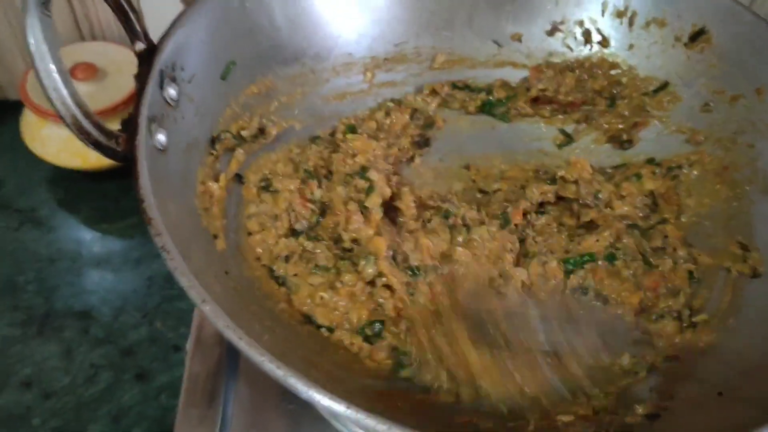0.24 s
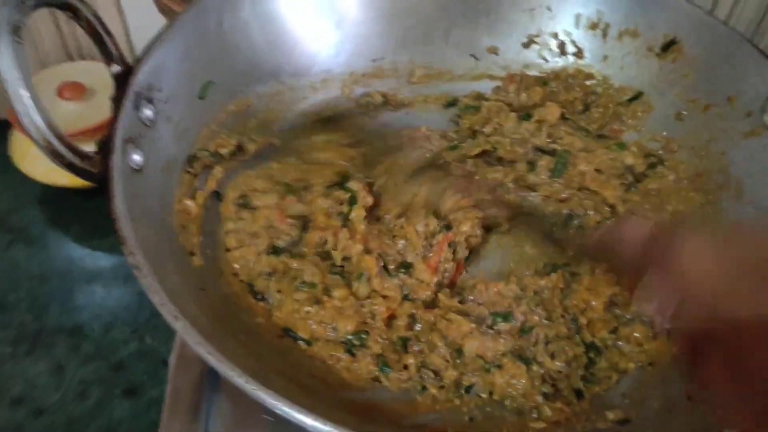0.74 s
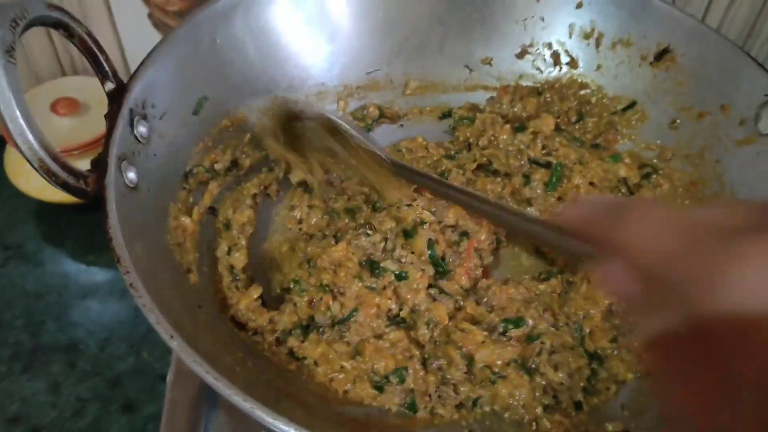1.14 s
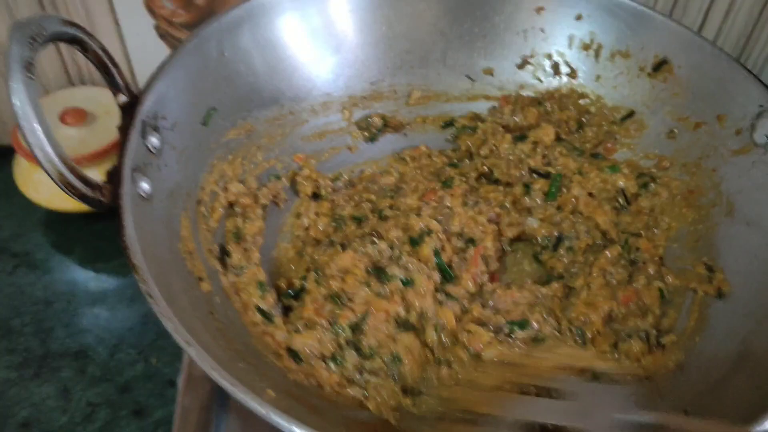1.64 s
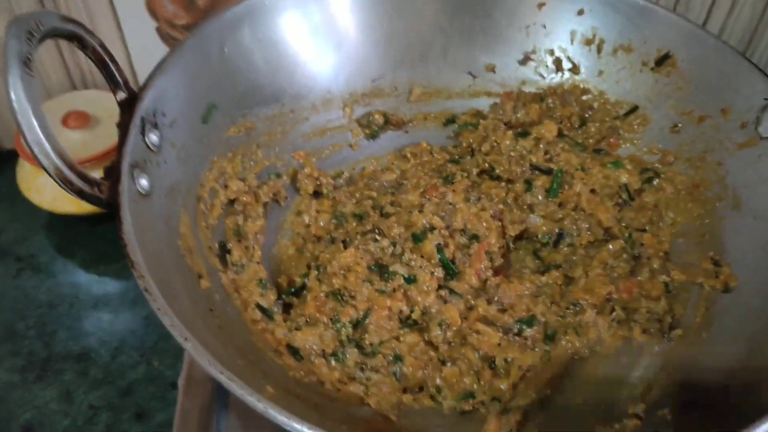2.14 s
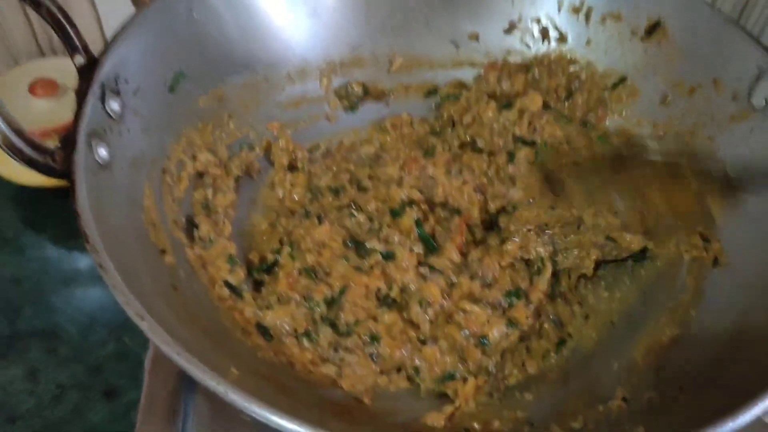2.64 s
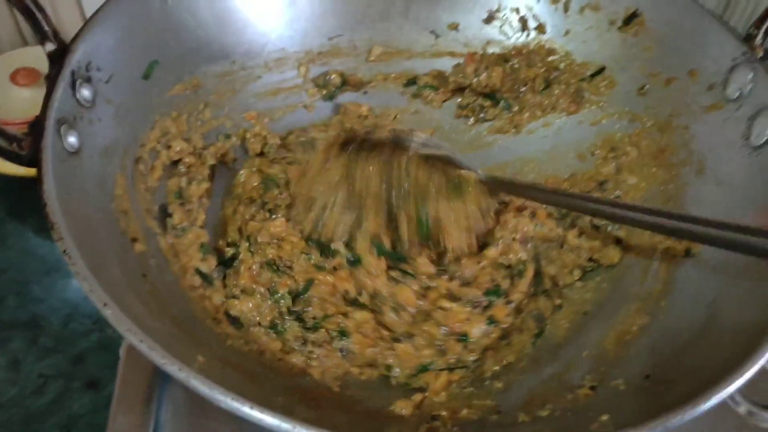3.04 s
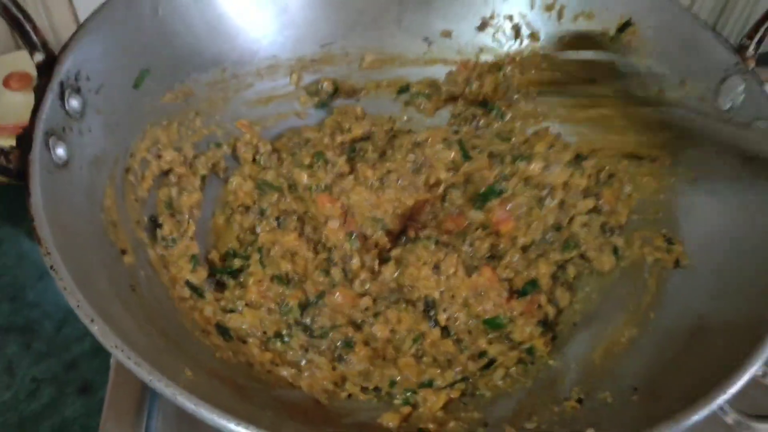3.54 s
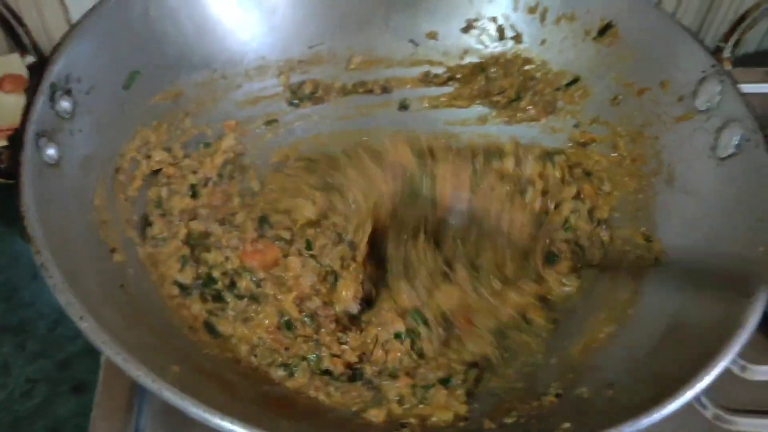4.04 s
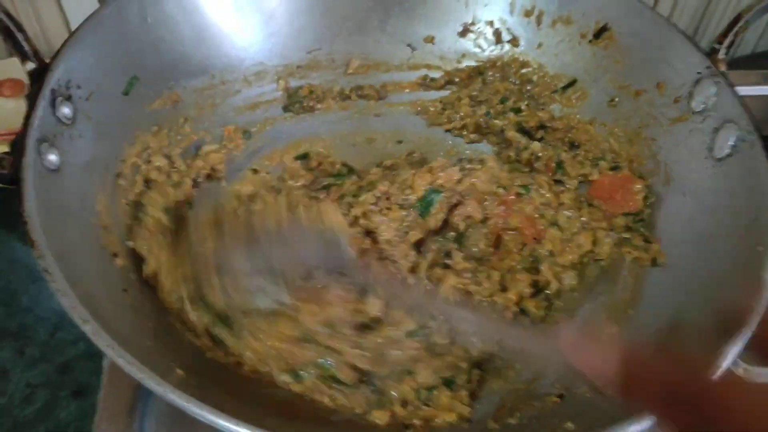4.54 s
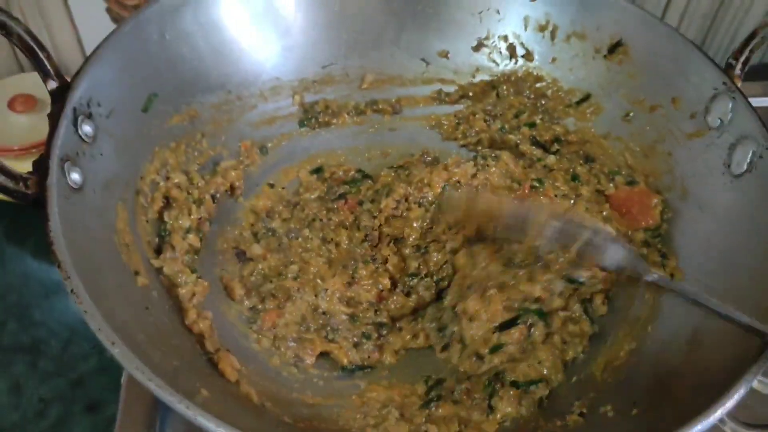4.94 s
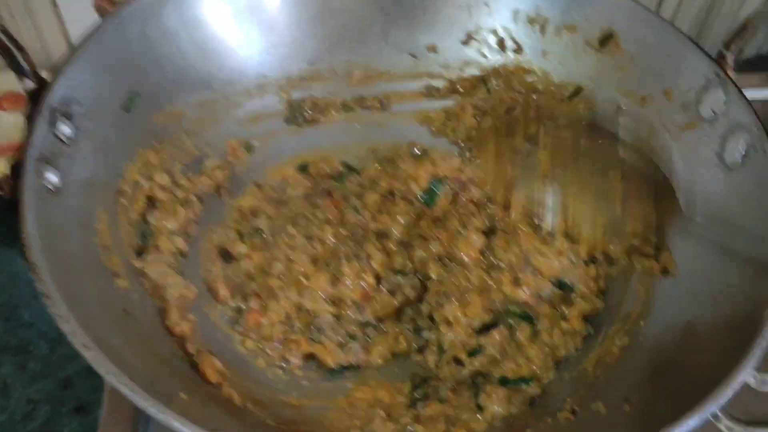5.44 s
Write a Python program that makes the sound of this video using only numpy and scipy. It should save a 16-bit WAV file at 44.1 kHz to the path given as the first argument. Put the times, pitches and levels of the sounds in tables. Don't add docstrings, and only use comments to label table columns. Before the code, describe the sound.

A metal spatula clacks into a thin metal pan again and again, scraping through thick food with short, damped clatter in a small kitchen.

```python
import sys
import numpy as np
from scipy import signal
from scipy.fft import rfft, irfft, next_fast_len
from scipy.io import wavfile
from scipy.ndimage import uniform_filter1d, minimum_filter1d

SR = 44100
rng = np.random.default_rng(int(sys.argv[2]) if len(sys.argv) > 2 else 0)


def master(y):
    cut = np.clip(np.atleast_2d(y).T, -1, 1)
    pcm = np.round(cut * 32767)
    wavfile.write(sys.argv[1], SR, pcm.astype(np.int16))


def attenuation_scalar(level_db):
    decades = np.asarray(level_db, float) / 20
    return 10 ** decades


N = 250488

# pitch_hz, level_db, ring_t60_s
BOWL_MODES = [(178, -6, 0.21), (219, -17, 0.31), (273.8, 5.5, 0.35), (293, -25, 0.57), (406.8, -2.5, 0.15),
              (421.8, 5, 0.071), (505.4, -12, 0.087), (560, -45.5, 0.32)]
# pitch_hz, level_db, ring_t60_s
BELLY_MODES = [(602, -0.5, 0.16), (757, 7.5, 0.11), (891, -46, 0.052), (1034.5, 14.5, 0.063),
               (1150, 10.5, 0.11), (1195, 9, 0.13)]
# pitch_hz, level_db, ring_t60_s
WALL_MODES = [(1907, 13, 0.081), (2194, 18, 0.2), (2405, 23, 0.049), (2530, -27, 0.17), (3060, -19, 0.1)]
# pitch_hz, level_db, ring_t60_s
EDGE_MODES = [(5620, -33, 0.18), (5060, 24, 0.26), (5550, -85, 0.074), (6110, -21, .1), (6570, 23, 0.3),
              (6710, 9, 0.22), (6000, 6, 0.098), (6880, 35, 0.099), (6940, 23, 0.1), (7500, -15, 0.067)]
# modes, band_hz, crowd_t60_s of a blow, ring_share_db, left_right_likeness (0 to 1)
PARTS = [
    (EDGE_MODES, (3820, 22000), 0.052, -10.5, 0.028),
    (WALL_MODES, (1210, 4100), 0.017, -9.5, 0.1),
    (BELLY_MODES, (764, 1280), 0.015, 0.11, 0.4),
    (BOWL_MODES, (200, 662), 0.059, -5.5, 0.97),
]
# pitch_hz, level_db (per Hz)
CLATTER_COLOUR = [(150, -31), (260, -7.5), (400, -4.5), (529, -14), (637, -7.5), (760, -8), (1210, -11),
                  (1680, -9.5), (2920, -6.5), (3820, -15.5), (6800, -4), (9000, -20.5), (15200, -33.5),
                  (16500, -12)]
# start_s, peak_db, wall_clack_db, belly_tock_db, left_right_db
LANDINGS = [(0.602, -10, -6.5, -7, -2), (1.542, 0, -8, -24.5, 1), (1.9054, -2.5, -6, -20, 5.5),
            (2.2843, -10, -14, -11, -1), (2.9853, -24.5, -2, -2, -3), (3.4096, -6, -11.5, -18.5, -2.5),
            (4.4039, -23, -26, -17.5, 9), (4.6018, -5, -33, -11, 3.5), (4.7459, -10, -5, -7, 4.5),
            (4.873, -11, -4.5, -9, -1.5), (5.4696, -15, -4.5, -8.5, -2.5)]
# start_s, peak_db, belly_tock_db, left_right_db
CATCHES = [(0.0676, -39.5, -15, 3), (0.1454, -38, -5.5, 4), (0.2547, -45, 3.5, -3), (1.648, -22, -24, 2),
           (2.668, -43.5, -0.5, -2.5), (2.6864, -36, -9, -5), (3.073, -38.5, -3, 9),
           (3.21, -38.5, -4.5, -4), (3.4818, -23, -13, -6), (3.661, -43, -17, 1), (3.7775, -44, 6.5, 1),
           (3.8485, -42, 4.5, 0), (3.8676, -37.5, 4, -2), (4.0252, -53, 4, -5), (4.2016, -40, -5, -1.5),
           (4.4264, -27.5, -26, -4), (5.1647, -37, -0.5, -3.5), (5.2195, -39, -26, 17),
           (5.242, -37.5, -40, 10), (5.6488, -34, -17, 5)]
# start_s, rasp_db, fade_db_per_s, bowl_weight_db, wall_clatter_db
SKIDS = [(0.608, -29.5, 194, -9, -4.5), (1.133, -54.5, 121, 8, -2), (1.545, -28, 139, -9.5, -7),
         (1.913, -27, 125, -11.5, -29), (2.289, -40.5, 176, 1, -1), (2.69, -53, 133, 8.5, 2.5),
         (2.99, -44, 131, -2.5, -14.5), (3.414, -34, 179, -3.5, -20), (3.777, -57.5, 116, 4.5, 3.5),
         (4.202, -56, 150, 7, -6), (4.421, -43.5, 120, 5, -2.5), (4.607, -22.5, 229, 0, -5),
         (4.752, -27.5, 220, 2.5, 0), (4.875, -33.5, 229, -17, 5.5), (5.16, -56.5, 198, 8, -10),
         (5.472, -32.5, 161, -4, -9)]
# peak_s, rasp_db, rise_db_per_s, fade_db_per_s, bowl_weight_db
SWEEPS = [(0.793, -32, 143, 149, -33), (0.85, -50.5, 84, 265, -32), (0.73, -47.5, 125, 125, -25),
          (0.951, -68, 73, 48, 8), (1.1, -49.5, 83, 60, -7.5), (1.195, -37, 212, 220, -11),
          (1.666, -28.5, 350, 314, -40), (1.8, -57.5, 62, 72, 3), (1.969, -32, 157, 175, -12.5),
          (2.354, -41.5, 116, 174, -8), (2.877, -55, 94, 39, -11), (3.08, -41.5, 147, 250, -15),
          (3.27, -66.5, 100, 68, 0), (3.486, -34, 234, 220, -28), (3.62, -55.5, 78, 66, 3),
          (3.867, -43.5, 136, 280, -29), (4.1, -59.5, 54, 100, -3), (4.349, -50.5, 376, 300, -2),
          (4.53, -51, 60, 139, 6), (4.911, -37.5, 100, 252, 6), (5.242, -37, 454, 150, -11),
          (5.41, -74, 117, 62, 18), (5.633, -49.5, 98, 267, -17)]
# time_s, pitch_hz
CONTACT_PITCH = [(0.6, 1270), (0.74, 1264), (0.81, 2237), (0.95, 1300), (1.2, 1900), (1.55, 2300),
                 (1.7, 1815), (1.91, 2625), (2.02, 1840), (2.3, 1397), (3.08, 1150), (3.41, 1990),
                 (3.47, 1150), (3.78, 1800), (3.86, 1150), (4.7, 1200), (5.24, 1894), (5.68, 1600)]
# start_s, pitch_hz, peak_db, ring_t60_s
CLANKS = [
    (1.544, 2180, -27, 0.16),
    (1.544, 2335, -25, 0.13),
    (1.55, 420, -32, 0.22),
    (3.482, 1080, -27, 0.047),
    (2.286, 330, -45, 0.2),
    (4.602, 2600, -35, 0.15),
    (5.19, 270, -50, 0.4),
    (0.255, 600, -46, .03),
]
# start_s, pitch_hz, level_db (rms), length_s
STAND_HUMS = [
    (1.928, 99.2, -49, 0.22),
    (4.928, 178, -58.5, 0.25),
    (5.263, 178, -59.5, 0.2),
]
# start_s, peak_db, width_s
PUFFS = [
    (1.539, -32, 0.0069),
    (1.906, -10, 0.0069),
    (4.601, -24, 0.0041),
    (4.744, -26, 0.0044),
    (4.79, -58, 0.011),
    (2.281, -39, 0.0069),
]
# pitch_hz, level_db (per Hz)
HUSH_COLOUR = [(15, -44), (25, -20), (95, 6.5), (192, -3), (226, -4), (470, -0.5), (952, -5), (1090, 0.5),
               (1220, -8), (1830, -2.5), (3410, -9.5), (6550, -2), (11600, -20), (15200, -12.5),
               (16500, -4)]
# pitch_hz, share_of_time_empty (0 to 1)
THIN_BANDS = [(2500, 0), (3300, .08), (3700, .3), (4100, .55), (4600, .2), (5300, .08), (6500, 0),
              (7600, .1), (8400, .45), (12000, .5), (15650, .45), (15750, 1)]

BITE_DB, BITE_S, SOFT_DB = 2, 0.0105, -37
SWEEP_WALL_DB, LIFT_S = -8, 0.01
BELLY_DB, BELLY_FOLLOWS = -7, 1
LIGHT_SHARE, LIGHTEST_DB = 0.5, -13
FIZZ_HZ, FIZZ_DB, FIZZ_GROWS = 8400, -21.5, 0.062
BELLY_FADE, BOWL_FADE = 0.76, 0.56
CATCH_WALL_DB, KNOCK_DB = -5, -9.5
KITCHEN_T60_S, KITCHEN_DB = 0.44, -11
HUSH_DB = -57.5
RUMBLE_DB, SHAKE_DB, SHAKE_FADE_DB_PER_S = -81.5, -45, 46
PORT_LAG_S = 0.00008


def rms_one(x):
    return x / np.sqrt(np.mean(x ** 2) + 1e-20)


def add_at(out, start, sound):
    out[:, start:start + sound.shape[1]] += sound[:, :N - start]


def drift(rate):
    knots = rng.standard_normal(400)
    return np.interp(np.arange(N) / SR * rate, np.arange(400), knots)


def coloured(spectrum, shape, low_hz=20, high_hz=17000):
    hz = np.arange(1, shape[-1] // 2 + 2) * SR / shape[-1]
    table_hz, table_db = np.transpose(spectrum)
    db = np.interp(np.log(hz), np.log(table_hz), table_db)
    skirts = 1 / np.sqrt((1 + (low_hz / hz) ** 8) * (1 + (hz / high_hz) ** 8))
    white = rfft(rng.standard_normal(shape))
    return rms_one(irfft(white * attenuation_scalar(db) * skirts, shape[-1]))


def two_ports(mid, side, likeness):
    likeness = np.clip(likeness, 0, 1)
    return np.sqrt(1 + likeness) * mid + np.sqrt(1 - likeness) * side * np.array([[1], [-1]])


def pressure_db(t, s, rise, fade):
    return -rise * np.maximum(s - t, 0) - fade * np.maximum(t - s, 0)


def response(modes, band_hz, t60, ring_db, likeness, spread_db):
    t = np.arange(SR // 2) / SR
    crowd = two_ports(*coloured(CLATTER_COLOUR, (2, len(t)), *band_hz), likeness) * attenuation_scalar(-60 * t / t60)
    crack = 1 + 0.71 * np.exp(-t / 0.00046)
    crowd = crowd * (1 - np.exp(-t / 0.0002)) * crack
    hz, db, ring_s = np.transpose(modes)[:, :, None]
    strength = attenuation_scalar(db + spread_db * rng.standard_normal((len(modes), 1)))
    turn = (1 - likeness) * np.pi * rng.uniform(-0.98, 1, (2, len(modes), 1))
    rings = (strength * attenuation_scalar(-60 * t / ring_s) * np.sin(2 * np.pi * hz * t + turn)).sum(axis=1)
    both = crowd / np.linalg.norm(crowd) + attenuation_scalar(ring_db) * rings / np.linalg.norm(rings)
    return both * np.sqrt(2) / np.linalg.norm(both)


def all_strokes():
    strokes = []
    for s, db, fade, weight, wall in SKIDS:
        bite_db = BITE_DB * np.clip((db - SOFT_DB) / 18, 0, 1)
        strokes.append((s, db, 0, fade, weight, wall, bite_db))
    for s, db, rise, fade, weight in SWEEPS:
        strokes.append((s, db, rise, fade, weight, SWEEP_WALL_DB, 0))
    return strokes


def scrape(slips_per_s, size_db, grip_db, smear, sing_db, sing_width_hz):
    t, out = np.arange(N) / SR, np.zeros((2, N))
    grip = drift(45) + 0.7 * drift(14)
    slips = rng.random(N) < slips_per_s * attenuation_scalar(grip_db * grip) / SR
    sizes = attenuation_scalar(size_db * np.minimum(rng.exponential(1, N), 4))
    ticks = rms_one(slips * sizes * rng.choice([-1, 1], N))
    push = rms_one(ticks + smear * rng.standard_normal(N))
    blur = np.exp(-np.pi * sing_width_hz / SR)
    flutter = rms_one(signal.lfilter([1], [1, -2 * blur, blur ** 2], ticks))
    spot = np.sin(2 * np.pi * np.cumsum(np.interp(t, *np.transpose(CONTACT_PITCH))) / SR)
    bright = signal.butter(4, [FIZZ_HZ, 15800], "band", fs=SR, output="sos")
    fizz = rms_one(signal.sosfilt(bright, np.abs(ticks) * rng.standard_normal((2, N))))
    lands = np.append(np.array(SKIDS)[:, 0], N / SR + 1)
    for s, rasp_db, rise, fade, weight_db, wall_db, bite_db in all_strokes():
        start = lands[lands <= s][-1]
        lift = lands[lands > s][0] - LIFT_S
        a = int(max(start, s - 0.3) * SR)
        b = min(int(min(lift, s + 0.45) * SR), N)
        now = t[a:b]
        bite = bite_db * np.exp(-np.abs(now - s) / BITE_S)
        edge_db = rasp_db + pressure_db(now, s, rise, fade) + bite
        belly_weight_db = BELLY_DB + BELLY_FOLLOWS * max(weight_db, LIGHTEST_DB)
        belly_db = rasp_db + belly_weight_db + pressure_db(now, s, rise, fade * BELLY_FADE)
        bowl_weight_db = weight_db + min(weight_db, 0) * LIGHT_SHARE
        bowl_db = rasp_db + bowl_weight_db + pressure_db(now, s, rise, fade * BOWL_FADE)
        levels = (edge_db, edge_db + wall_db, belly_db, bowl_db)
        for part, db, drive in zip(PARTS, levels, (ticks, ticks, push, push)):
            modes, band, t60, ring_db, alike = part
            touch = response(modes, band, t60 * 0.68, ring_db - 3.5, alike, spread_db=4.0)
            add_at(out, a, signal.fftconvolve(drive[None, a:b] * attenuation_scalar(db), touch, axes=1))
        out[:, a:b] += fizz[:, a:b] * attenuation_scalar(edge_db + FIZZ_DB + FIZZ_GROWS * (edge_db + 35))
        out[:, a:b] += flutter[a:b] * spot[a:b] * attenuation_scalar(edge_db + wall_db + sing_db)
    return out


def blows():
    out = np.zeros((2, N))
    catches = [(s, db, CATCH_WALL_DB, belly, pan) for s, db, belly, pan in CATCHES]
    for s, peak_db, wall_db, belly_db, pan_db in LANDINGS + catches:
        side_db = pan_db * np.array([[0.5], [-0.5]])
        for part, db in zip(PARTS, (0, wall_db, belly_db, belly_db + KNOCK_DB)):
            sound = response(*part, spread_db=-3.0)
            sound = sound / np.abs(sound).max() * attenuation_scalar(peak_db + db + 1.0 + side_db)
            add_at(out, int(s * SR), sound)
    return out


def clanks():
    out = np.zeros((2, N))
    for s, hz, db, t60 in CLANKS:
        t = np.maximum(np.arange(N) / SR - s, 0)
        turn = np.array([[0], [hz / 2400]])
        out += attenuation_scalar(db - 60 * t / t60) * (1 - np.exp(-t / 0.00057)) * np.sin(2 * np.pi * hz * t + turn)
    return out


def stand():
    t, out = np.arange(N) / SR, np.zeros(N)
    for s, hz, db, length in STAND_HUMS:
        u = np.clip((t - s) / length, 0, 1)
        swell = np.sin(np.pi * u) ** 0.31 * attenuation_scalar(-5.5 * u)
        out += attenuation_scalar(db + 6.5) * swell * np.sin(2 * np.pi * hz * t)
    return out


def puffs():
    t, out = np.arange(N) / SR, np.zeros(N)
    for s, db, width in PUFFS:
        u = np.maximum(t - s, 0) / width
        out -= attenuation_scalar(db) * np.sin(2 * np.pi * u ** 0.82) * np.exp(-u * 1.86)
    return out * attenuation_scalar([[-26], [0]])


def kitchen(x):
    t = np.arange(int(0.6 * SR)) / SR
    echo = rng.standard_normal((2, len(t))) * attenuation_scalar(-60 * t / KITCHEN_T60_S) * np.clip(t / 0.02, 0, 1)
    echo = signal.lfilter([1], [1, -0.3], echo)
    echo = echo / np.linalg.norm(echo, axis=1, keepdims=True)
    return attenuation_scalar(KITCHEN_DB) * signal.fftconvolve(x, echo, axes=1)[:, :N]


def hush():
    size, t = next_fast_len(N), np.arange(N) / SR
    air = two_ports(*coloured(HUSH_COLOUR, (2, size), 140, 17100), likeness=0.47)[:, :N]
    deep = two_ports(*coloured(HUSH_COLOUR, (2, size), 15, 120), likeness=0.95)[:, :N]
    shake = np.zeros(N)
    for s, db, _, weight, _ in SKIDS:
        shake += attenuation_scalar(db + 2.7 * weight + SHAKE_DB + pressure_db(t, s, 900, SHAKE_FADE_DB_PER_S))
    rumble = (attenuation_scalar(RUMBLE_DB) + shake) * attenuation_scalar(8.0 + 2.0 * drift(17)) * deep
    return attenuation_scalar(HUSH_DB + 0.77 * drift(6)) * air + rumble


def scene():
    pan = scrape(slips_per_s=1500, size_db=3.5, grip_db=3.5, smear=0.9, sing_db=-7.5, sing_width_hz=310)
    pan = pan + blows() + clanks()
    no_bass = signal.butter(4, 120, "high", fs=SR, output="sos")
    pan = signal.sosfilt(no_bass, pan)
    return pan + kitchen(pan) + stand() + puffs() + hush()


def thin_out(x):
    lead = 172
    hz, _, frames = signal.stft(np.pad(x, ((0, 0), (lead, 0))), SR, "cosine", nperseg=2048)
    draws = rng.standard_normal((len(hz) // 7 + 1, frames.shape[-1]))
    draws = uniform_filter1d(draws, size=3) * np.sqrt(3)
    rank = 1 / (1 + np.exp(-1.7 * np.repeat(draws, 7, axis=0)[:len(hz)]))
    level = np.abs(frames).sum(axis=(0, 1))
    calm = level < 2.2 * minimum_filter1d(level, size=2)
    empty = (rank < np.interp(hz, *np.transpose(THIN_BANDS))[:, None]) & calm
    thinned = frames * np.where(empty, attenuation_scalar(-40), 1)
    return signal.istft(thinned, SR, "cosine", nperseg=2048)[1][:, lead:lead + N]


def low_pass(x):
    return signal.sosfilt(signal.butter(12, 16830, fs=SR, output="sos"), x)


def record(dry):
    n = np.arange(N)
    left = np.interp(n - round(PORT_LAG_S * SR), n, dry[0])
    ports = np.array([left, dry[1]])
    rounded = 0.94 * np.tanh(ports / 0.77)
    top = signal.cheby2(12, 70, 17000, fs=SR, output="sos")
    mix = thin_out(signal.sosfilt(top, rounded))
    return low_pass(mix)


dry = scene()
out = record(dry)
master(out)
```